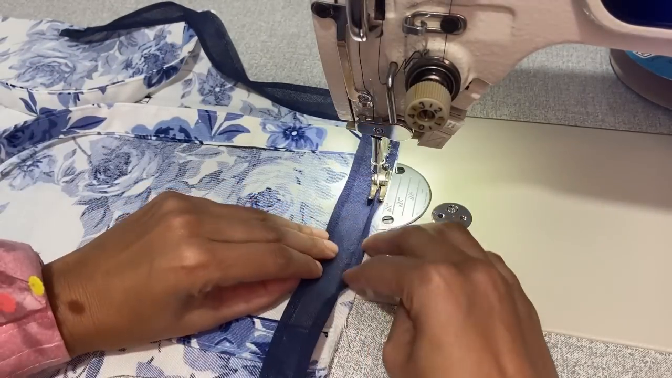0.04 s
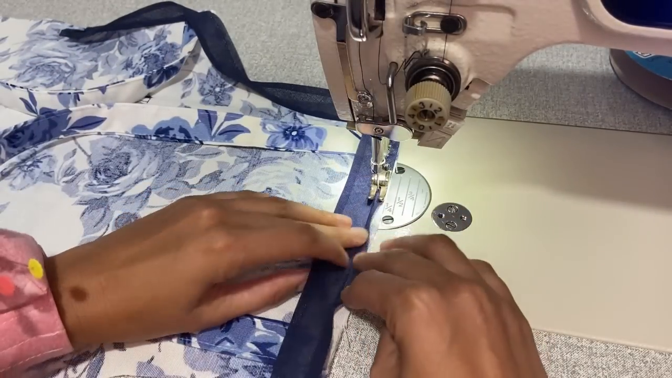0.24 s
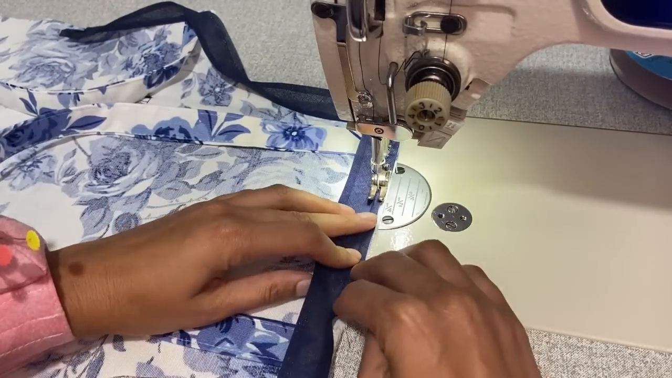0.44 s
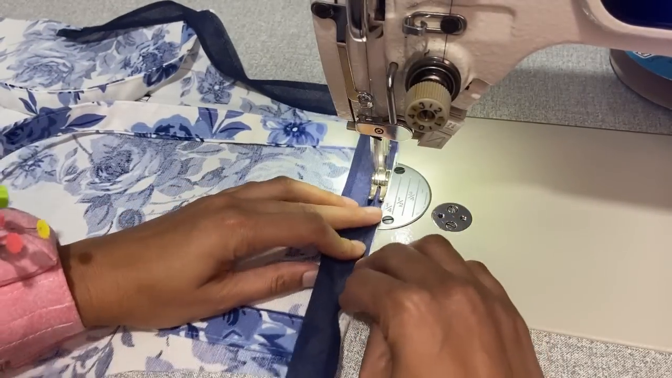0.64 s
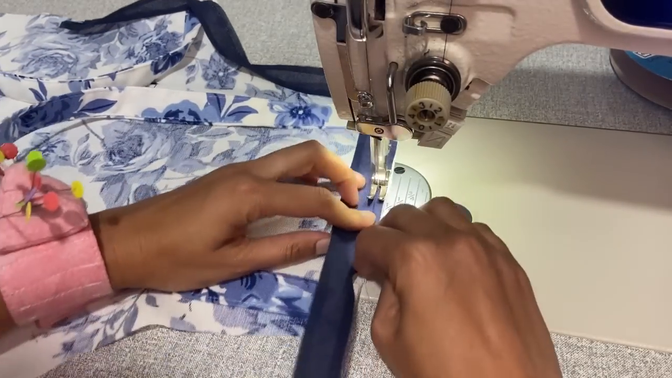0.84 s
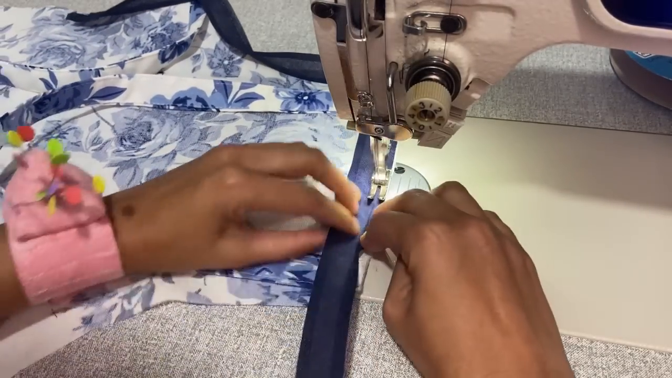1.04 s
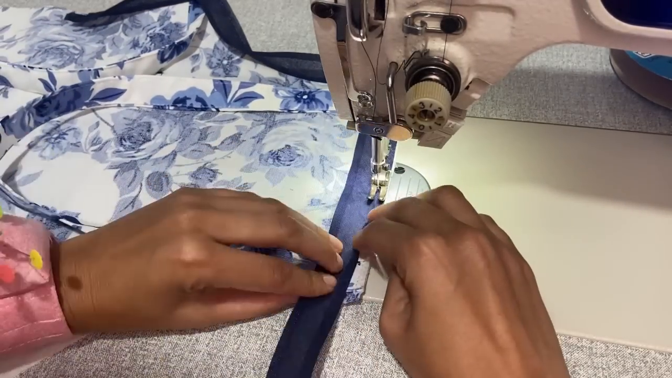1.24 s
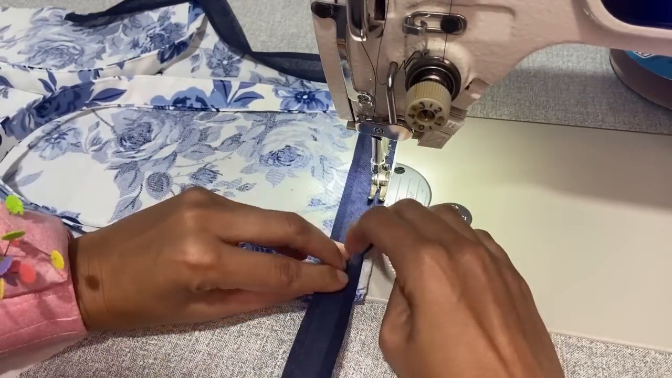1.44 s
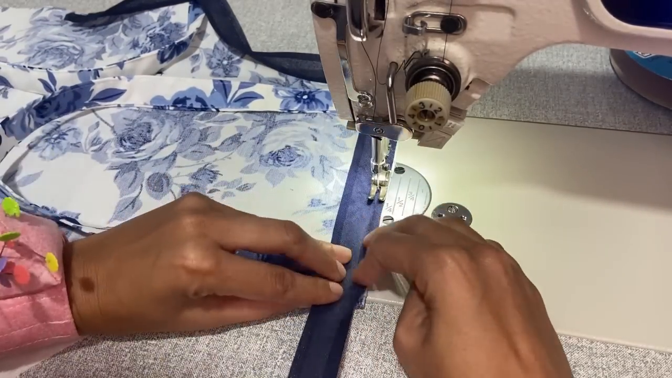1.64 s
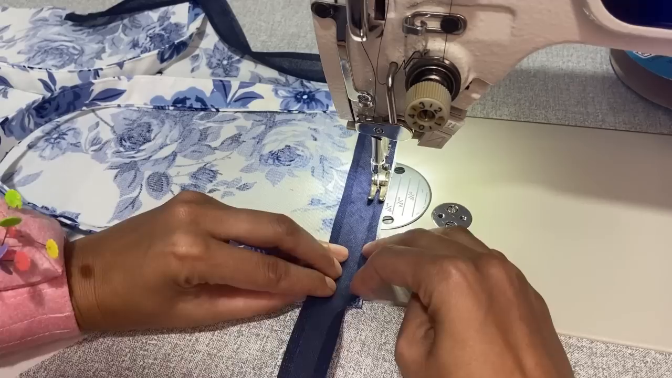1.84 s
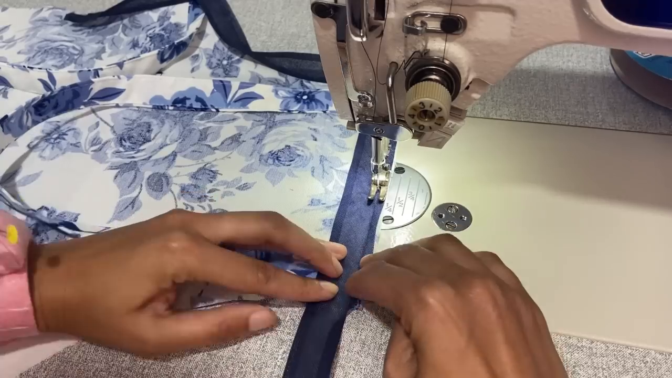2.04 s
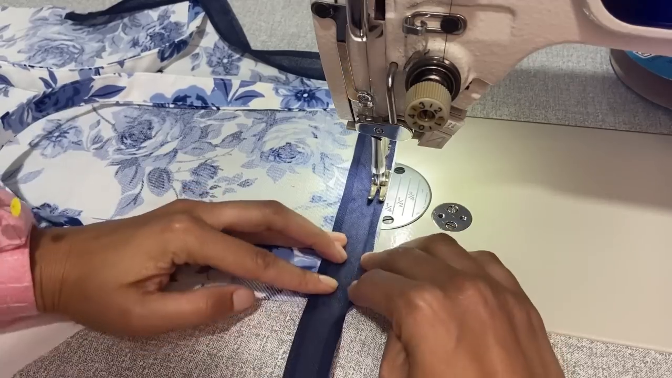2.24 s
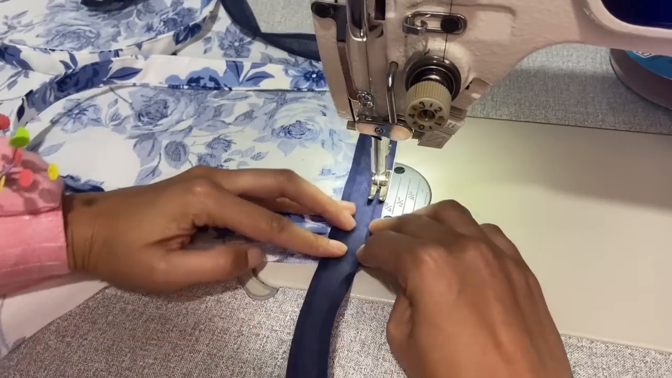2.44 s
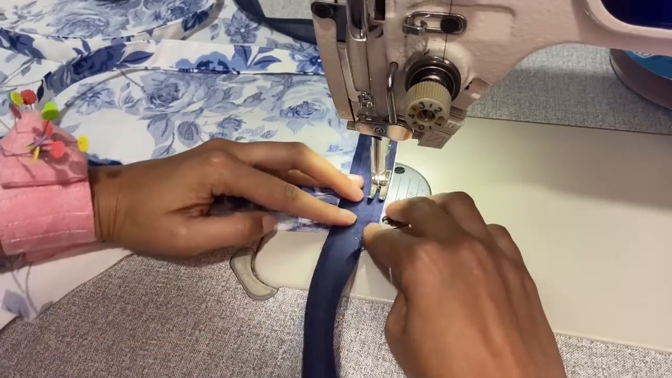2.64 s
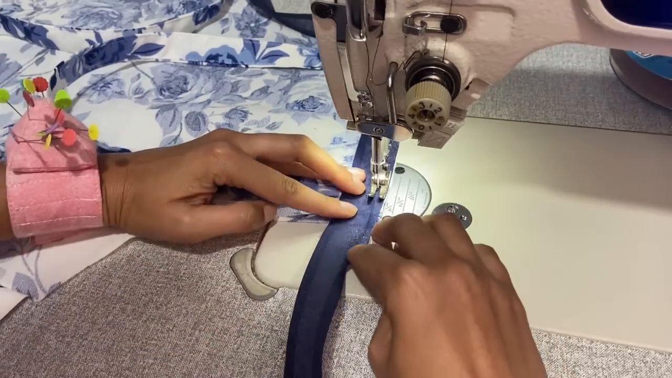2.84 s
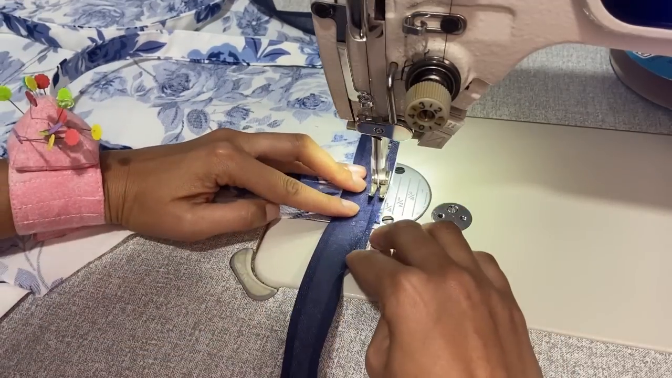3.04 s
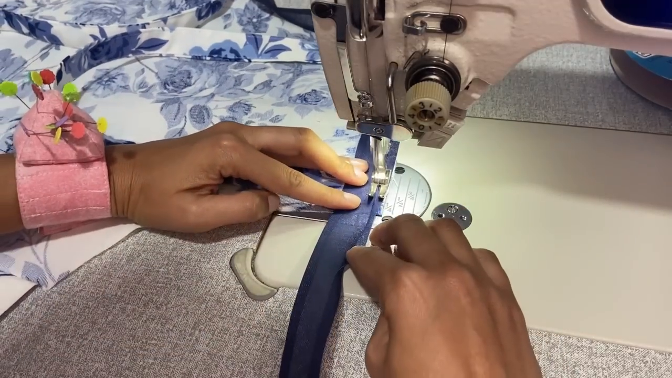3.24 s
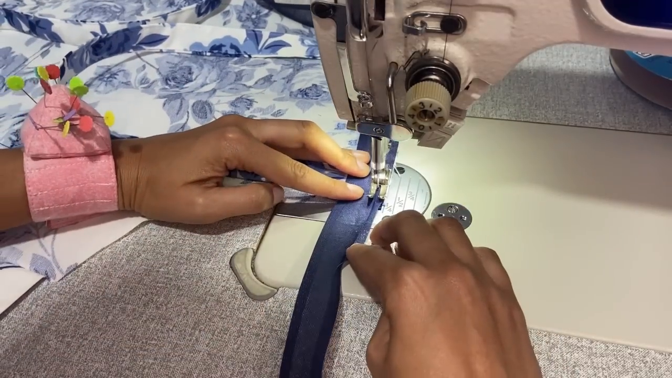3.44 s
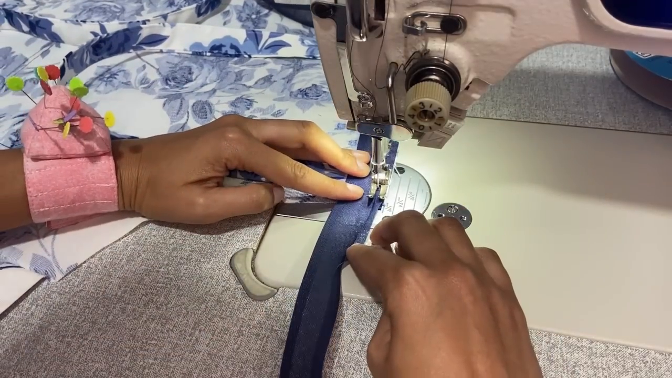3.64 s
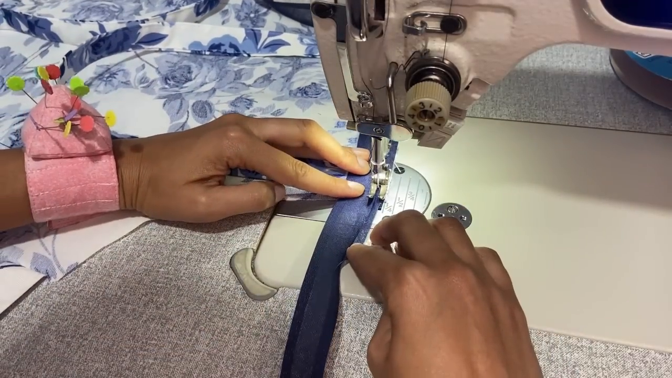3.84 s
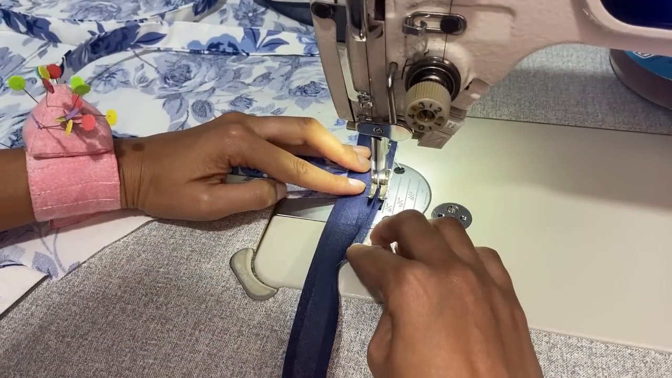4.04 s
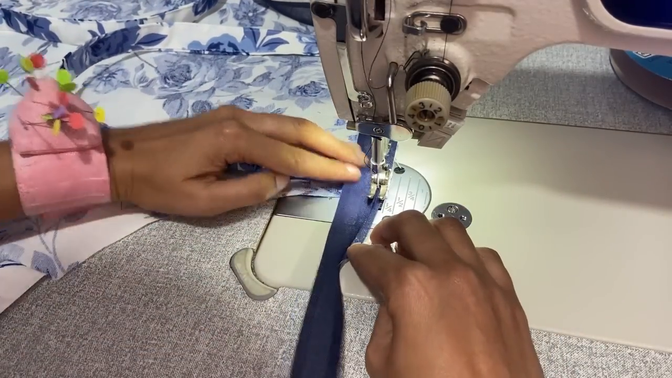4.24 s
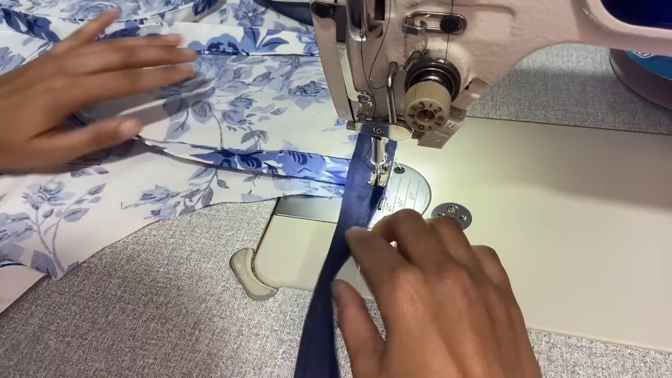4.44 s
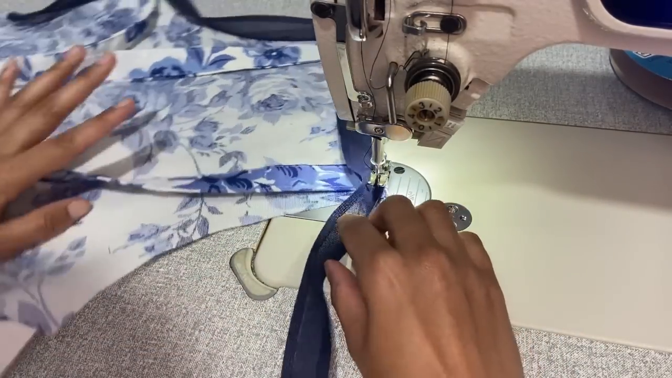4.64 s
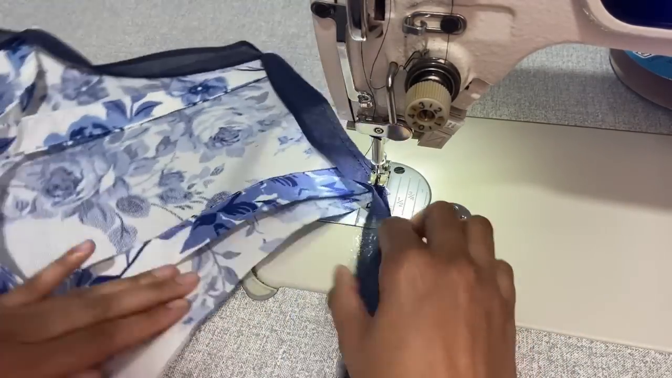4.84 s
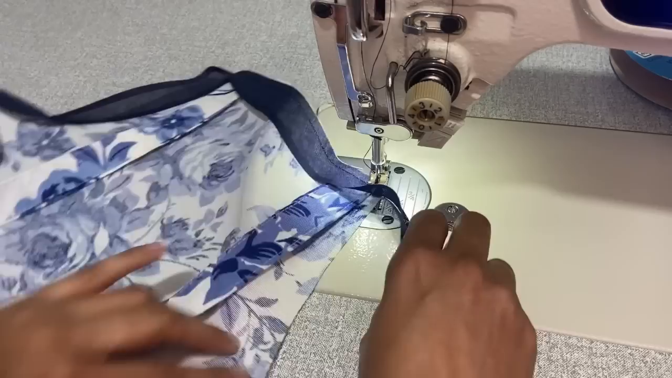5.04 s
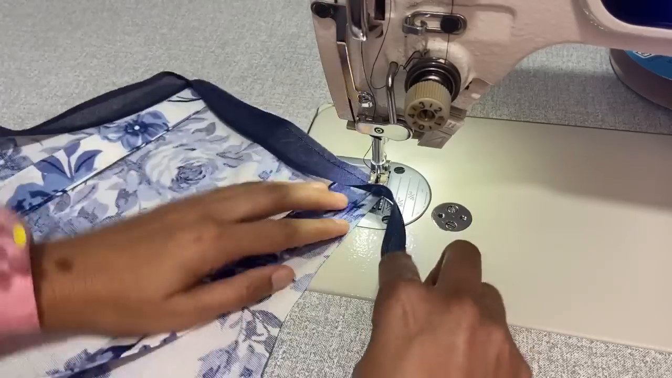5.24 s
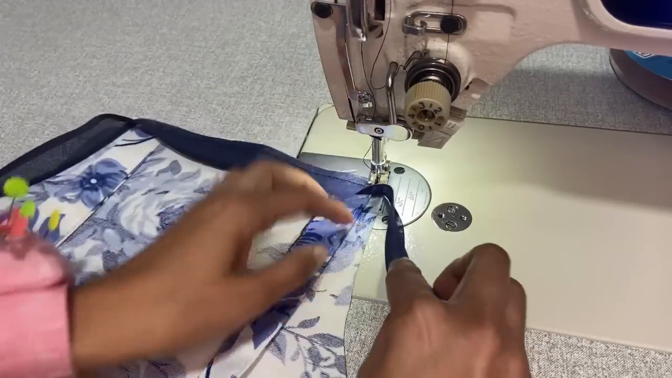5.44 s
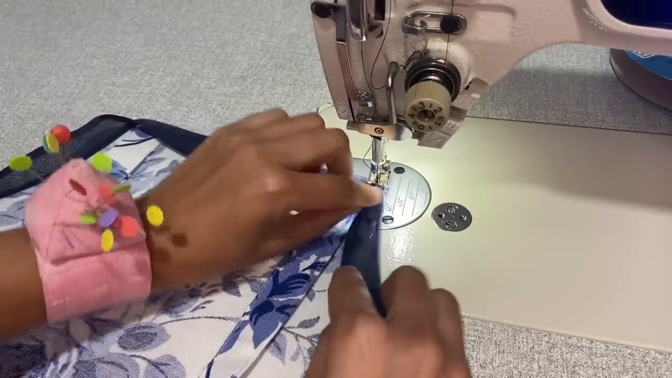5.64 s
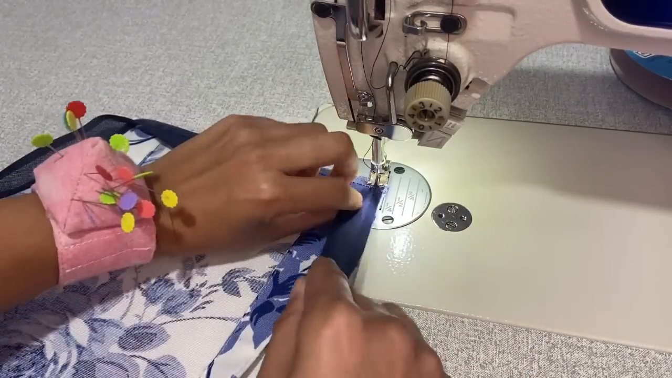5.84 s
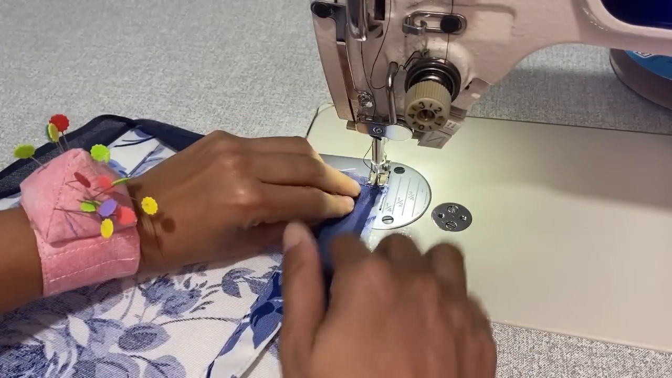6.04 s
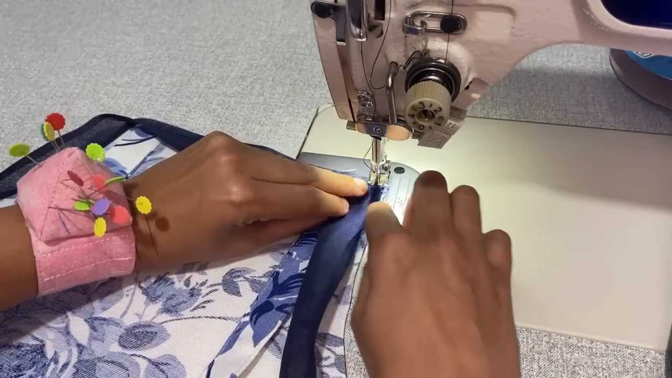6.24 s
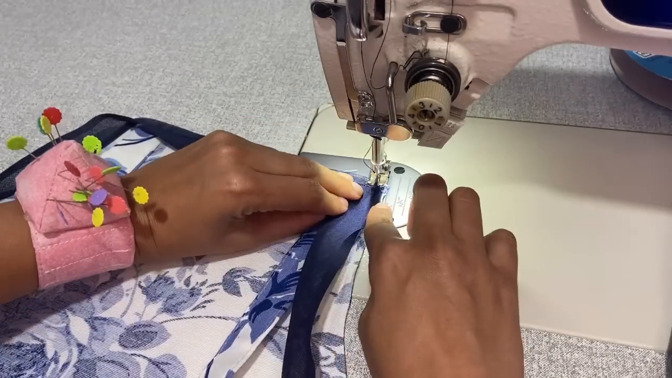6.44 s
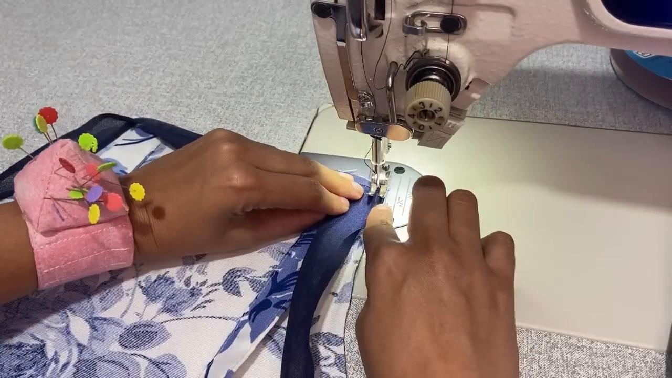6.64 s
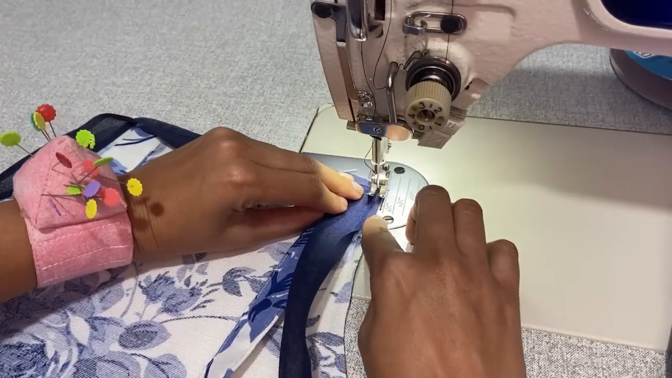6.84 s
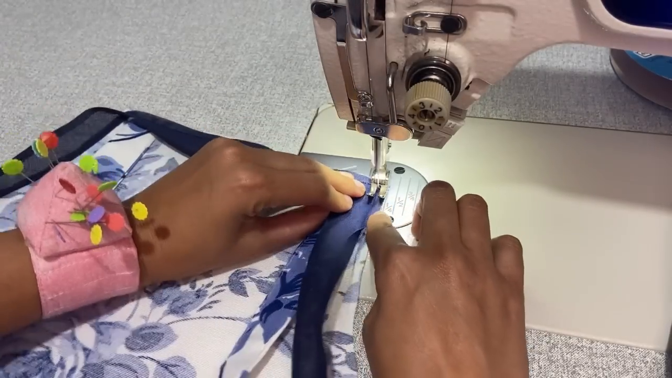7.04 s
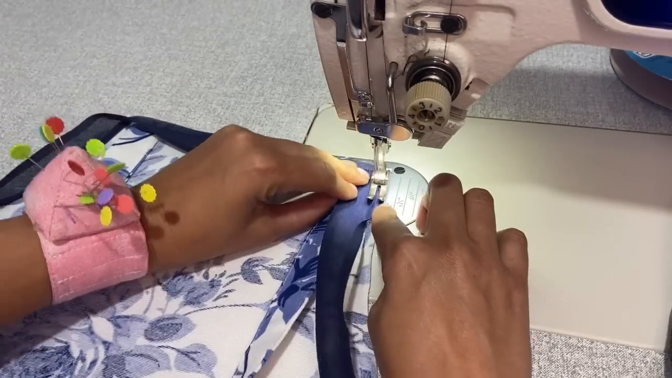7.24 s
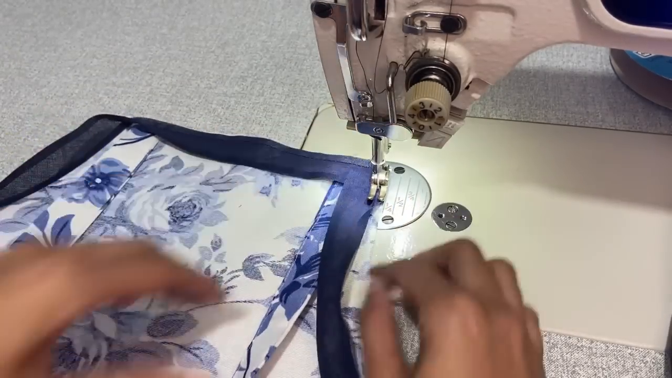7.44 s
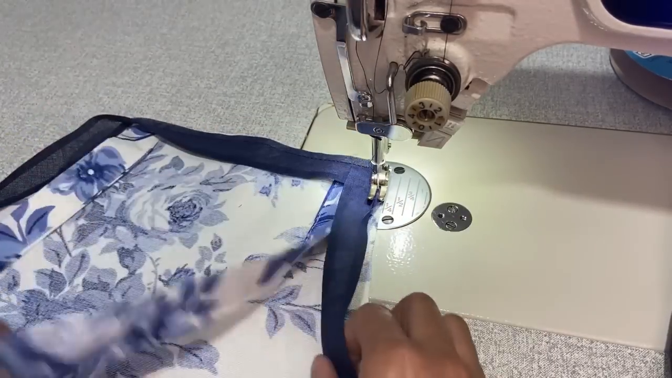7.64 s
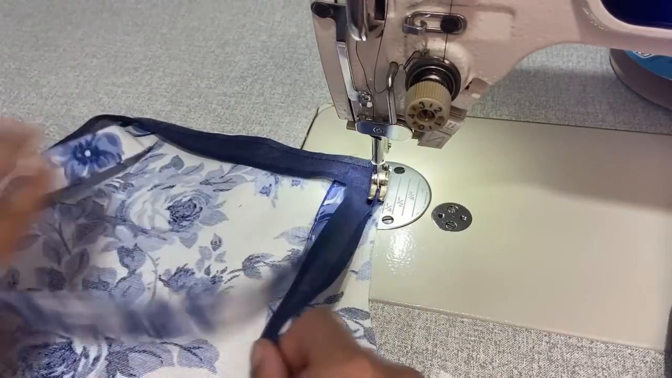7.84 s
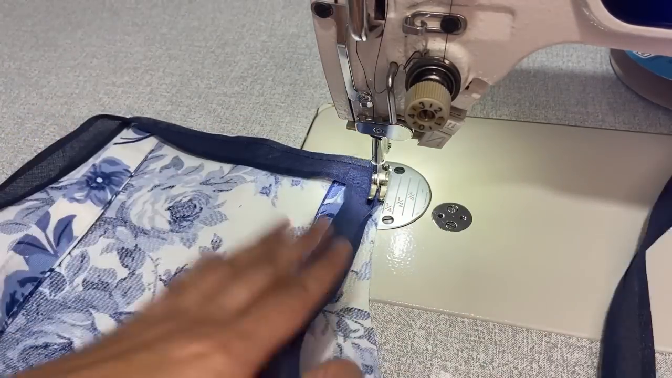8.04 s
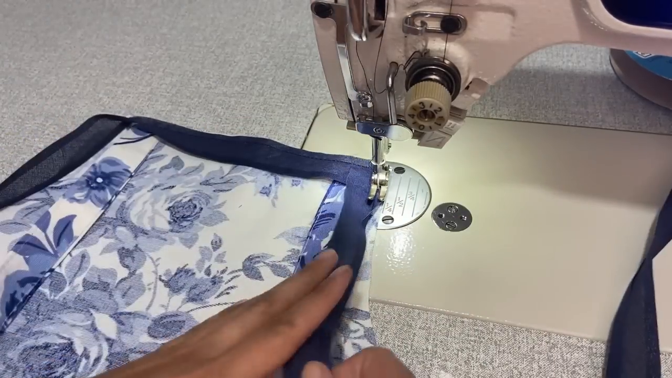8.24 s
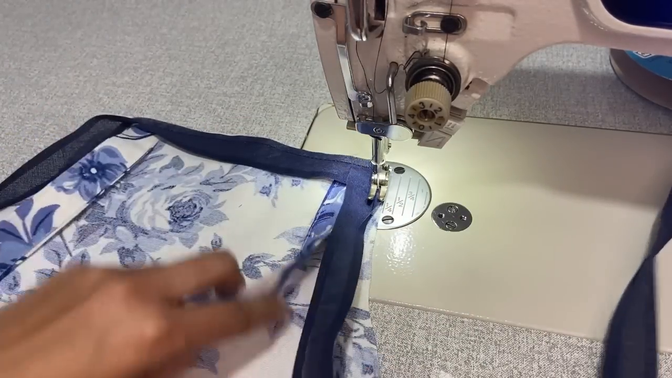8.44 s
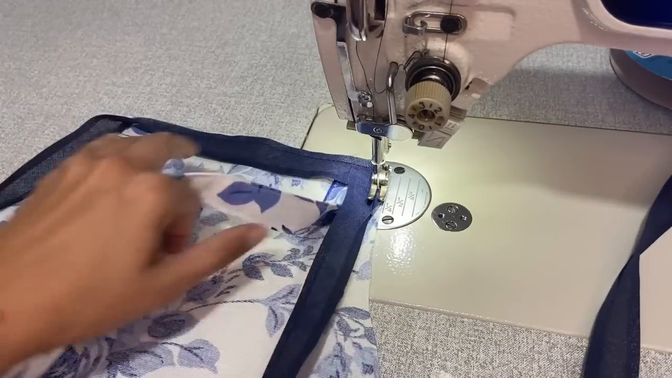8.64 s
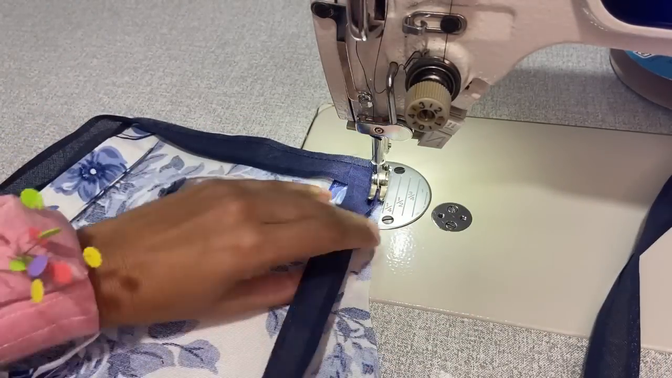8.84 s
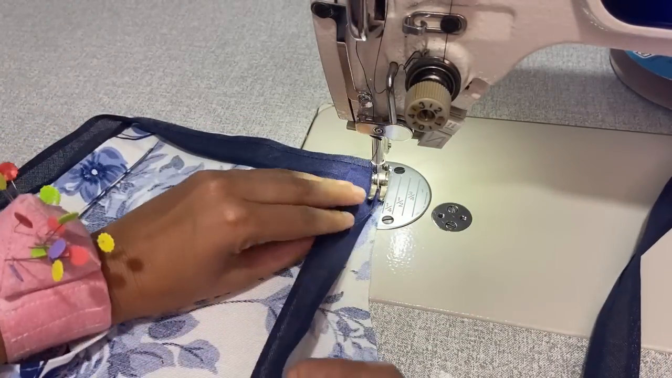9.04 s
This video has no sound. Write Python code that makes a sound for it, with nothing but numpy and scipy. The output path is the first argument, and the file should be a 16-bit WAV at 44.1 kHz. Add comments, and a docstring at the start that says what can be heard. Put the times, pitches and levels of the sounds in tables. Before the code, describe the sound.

A sewing machine stitches in brief bursts, each starting with a click, speeding into a thumping, droning rattle and braking to a latch. Pauses hold only quiet rumble and faint cloth. Midway the presser foot clacks up, fabric is shifted with rustles and dull thuds, the foot clacks down, one short run follows, then soft handling. Close microphone, small room, wide bright treble.

```python
"""An industrial sewing machine stitches in short runs, close to a two-port microphone.
Hook and needle bar clatter as bursts of resonant noise over the whirr of the drive; strokes thump the
ringing bed, table and head drone, cover plates ring on. Between runs the presser foot clacks up and down
as swelling noise bursts; soft thuds, knocks and low swells are short resonant noises, and hands shift
rustling cloth (filtered noise), in a small quiet room with a low rumble."""
import sys
import numpy as np
from scipy import signal
from scipy.fft import rfft, irfft, next_fast_len
from scipy.io import wavfile
from scipy.ndimage import uniform_filter1d

SR = 44100
rng = np.random.default_rng(int(sys.argv[2]) if len(sys.argv) > 2 else 0)


def int16_out(signal):
    """Quantize to a 16-bit WAV file."""
    q = np.round(np.clip(np.atleast_2d(signal).T, -1, 1) * 32767)
    wavfile.write(sys.argv[1], SR, q.astype(np.int16))


N = 401310
STEP = 64  # samples between the points of a slow control

# Runs of stitching; levels before the mix gains.
# Each row: start, brake, stop, full speed and slowing in seconds, then whirr, thump, table drone, head drone,
# brake jolt, click-in and latch in dB.
STITCH_RUNS = [(0.534, 1.103, 1.154, .62, 1.0, -39, -39, -43, -40, -50, -43.5, -42.5),
               (2.171, 2.767, 2.818, 2.33, 2.68, -38.5, -38, -35, -37, -47, -41.5, -43),
               (2.956, 3.417, 3.487, 3.23, 3.33, -42, -46, -50, -33, -50, -43, -41),
               (3.691, 3.805, 3.849, 3.70, 3.73, -52, -60, -66, -68, -44, -42.5, -43.5),
               (3.974, 4.07, 4.128, 3.985, 4.02, -54, -60, -66, -66, -40, -42, -43),
               (6.969, 7.313, 7.378, 7.11, 7.24, -39, -41, -46, -42, -40, -47, -44)]
# Strokes that stand out and replace an ordinary one; levels before the mix gains.
# Each row: time in seconds, level in dB, power share of needle bar against hook (0-1), thump in dB.
ACCENTED_STROKES = [(0.601, -39, 0.22, -44.5), (0.695, -32.5, 1, -46.5), (.823, -42, .6, -41),
                    (.869, -35.5, 1, -36.5), (0.898, -36.5, 1, -38.5), (0.944, -38.5, .4, -37),
                    (.993, -35, 0.2, -41), (1.062, -51, 0.6, -38.5), (2.257, -42, 0.09, -50),
                    (2.299, -38, 0.66, -41.5), (2.684, -36.5, 0, -41.5), (3.058, -42, 0.5, -55.5),
                    (3.082, -41.5, 0, -61), (3.178, -39.5, 0.1, -44), (3.234, -37, .64, -38),
                    (3.143, -46, 0.7, -53.5), (3.286, -34, 0.6, -62), (3.752, -48.5, 0.4, -56.5),
                    (2.358, -36, .8, -39.5), (3.357, -36, .16, -47.5), (4.013, -48, 0.2, -58.5),
                    (7.067, -43, .14, -52), (7.113, -36, .05, -43), (7.183, -37, 0.07, -43),
                    (7.235, -41.5, .05, -51)]
# drive speed in dB under full speed
ENGAGE_DB, CREEP_DB, DROP_DB, BRAKE_DB, STOP_DB = -18.5, -1.5, -11.5, -15.5, -23
FADE_IN_S, LEAD_S, DROP_S, FADE_OUT_S = .045, .0094, .042, .12  # drive catches LEAD_S before the click
CLICK_SHARE, BRAKE_SHARE, LATCH_SHARE, BRAKE_CLICK_DB = .19, .41, .08, -40  # shares of needle bar
STROKES_PER_S, STROKE_DB, STROKE_SPREAD_DB, THUMP_SPREAD_DB = 20, -1.5, 4, 4  # STROKE_DB re whirr
THUMP_STEEP, TABLE_STEEP, HEAD_STEEP = 1.62, 1.1, 1.43  # dB of level per dB of speed


def stitching():
    """Speed sets whirr, drones and ordinary strokes; clicks, jolts and accents have their own levels."""
    hook, bar, thump, jolt = np.zeros((4, N))
    t = np.arange(0, N, STEP) / SR
    whirr, table, head = np.zeros((3, len(t)))
    strokes = [row[:3] for row in ACCENTED_STROKES]
    accent_s = np.array(ACCENTED_STROKES)[:, 0]
    for s, _, _, thump_db in ACCENTED_STROKES:
        add_burst(thump, s, thump_db, 12, 20)
    for (start, brake, stop, full, slowing, whirr_db, thump_db, table_db, head_db,
         jolt_db, click_db, latch_db) in STITCH_RUNS:
        times = [start - FADE_IN_S, start - LEAD_S, full, slowing, slowing + DROP_S,
                 brake, stop, stop + FADE_OUT_S]
        speeds_db = [-45, ENGAGE_DB, CREEP_DB, 0, DROP_DB, BRAKE_DB, STOP_DB, -45]
        speed_db = np.interp(t, times, speeds_db, -200, -200)
        whirr += gain_of(whirr_db + speed_db) ** 2
        table += gain_of(table_db + TABLE_STEEP * speed_db) ** 2
        head += gain_of(head_db + HEAD_STEEP * speed_db) ** 2
        strokes += [(start, click_db, CLICK_SHARE), (brake, BRAKE_CLICK_DB, BRAKE_SHARE),
                    (stop, latch_db, LATCH_SHARE)]
        add_burst(jolt, brake, jolt_db, 14, 22)
        for k, (late, loud, hard, share) in enumerate(rng.standard_normal((16, 4))):
            s = start + (k + .1 * late) / STROKES_PER_S
            if s < brake - .03 and abs(s - accent_s).min() > .025:
                now_db = np.interp(s, t, speed_db)
                stroke_db = whirr_db + now_db + STROKE_DB + STROKE_SPREAD_DB * loud
                strokes.append((s, stroke_db, .6 + .16 * share))
                hit_db = thump_db + THUMP_STEEP * now_db + THUMP_SPREAD_DB * hard
                add_burst(thump, s, hit_db, 12, 20)
    for s, db, share in strokes:
        share = np.clip(share, .01, .99)
        add_burst(hook, s, db + 10 * np.log10(1 - share), 8, 10)
        add_burst(bar, s, db + 10 * np.log10(share), 10, 12)
    return hook, bar, thump, jolt, spread(whirr), spread(table), spread(head)


# Resonances of the hook. Each row: frequency in Hz, width in Hz, level in dB.
HOOK_MODES = [(860, 1900, -1), (2000, 310, 0.5), (3130, 320, -5.5), (4780, 860, -11), (7140, 380, 0),
              (8126, 980, 3), (12430, 700, -6.5), (12850, 800, -6.5), (13880, 430, -2),
              (15260, 1500, -12.5)]
# Resonances of the needle bar. Each row: frequency in Hz, width in Hz, level in dB.
NEEDLE_BAR_MODES = [(830, 1200, 1), (1950, 290, -20), (3100, 1400, 1), (5070, 1200, 2.5),
                    (7650, 410, -13.5), (8100, 600, -6.5), (9640, 3600, -3.5), (11800, 700, -1.5),
                    (12350, 500, -9.5), (13900, 600, -18.5), (15300, 1200, -6.5)]


def clatter_and_whirr(hook, bar, whirr):
    """Noise through the metal resonances; patches of colour stand for narrow modes of small parts."""
    whirr = whirr * flicker(5.4, 1.3) ** 2
    hook_ring, bar_ring = (
        mottle(noise(lambda hz: peaks(modes, hz)), frame=1024, bins=3, frames=6, depth_db=1.9)
        for modes in (HOOK_MODES, NEEDLE_BAR_MODES))
    sound = np.sqrt(hook + .78 * whirr) * hook_ring + np.sqrt(bar + .32 * whirr) * bar_ring
    return gain_of(-1.63) * sound * flicker(1.5, 1.5)  # fast random grain in the level


# Modes of bed and table, ringing freely. Each row: frequency in Hz, level in dB, t60 in seconds.
BED_MODES = [(96, 1, .3), (176, -4.5, 0.27), (217, -4, 0.38), (275.3, -7.5, 0.44), (325, -3, 0.097),
             (399.8, -9, 0.39), (520, -3, 0.04), (587.7, -4.5, 0.31), (620, -6.5, 0.14), (958, -8, .2),
             (1560, -6, 0.15), (1640, -9.5, 0.3), (1756, -11, 0.22)]


def bed_thumps(power):
    """Noise pushes excite the bed modes, here damped by cloth and foot."""
    push = np.sqrt(power) * noise(lambda hz: peaks([(402, 290, 0)], hz))
    return ring_on(push, [(hz, db, t60 / 2.43) for hz, db, t60 in BED_MODES])


def bed_blow(s, db, rise_ms, colour):
    """One blow sets the bed ringing freely; the colour of the blow weights the modes."""
    near = slice(round((s - .03) * SR), round((s + .6) * SR))
    out = np.zeros((2, N))
    t = (np.arange(N) / SR - s)[near]
    swell = np.exp(-(np.minimum(t, 0) * 1000 / rise_ms) ** 2)
    for hz, mode_db, t60 in BED_MODES:
        turn = 2 * np.pi * (hz * t + rng.random() + np.array([[0], [.25]]))  # quarter turn between channels
        decay = gain_of(db + mode_db - 60 * np.maximum(t, 0) / t60)
        out[:, near] += peaks(colour, hz) * decay * swell * np.sin(turn)
    return out


TABLE_LAG_S, HEAD_LAG_S = .05, .035  # the drones build up and ring on
TABLE_JOLT_DB, HEAD_JOLT_DB = -8.5, -2  # share of the brake jolt in each drone


def drones(table, head, jolt):
    """Table and head resonate as narrow low noise, lagging behind the drive and the brake jolt."""
    table = linger(table + gain_of(TABLE_JOLT_DB) ** 2 * jolt, TABLE_LAG_S)
    head = linger(head + gain_of(HEAD_JOLT_DB) ** 2 * jolt, HEAD_LAG_S)
    table_modes = [(84.5, 12, 19.5), (98.0, 48, 6.0), (113.8, 21, -4.0)]
    table = table * steady(noise(lambda hz: peaks(table_modes, hz)))
    head = head * steady(noise(lambda hz: peaks([(168.0, 81, 0)], hz)))
    return table + head


# Thin cover plates. Each row: frequency in Hz, level in dB.
PLATE_MODES = [(545, 7), (1820, 0), (1945, -1), (2010, -4.5), (2450, 2), (4910, -4.5)]
PLATES_DB, PLATES_T60_S = -14.5, .16


def cover_plates(clatter):
    """The clatter excites thin plates, which ring on briefly."""
    return gain_of(PLATES_DB) * ring_on(clatter, [(hz, db, PLATES_T60_S) for hz, db in PLATE_MODES])


def machine():
    """Direct clatter, and the rumble of the structure it shakes."""
    hook, bar, thump, jolt, whirr, table, head = stitching()
    clatter = clatter_and_whirr(hook, bar, whirr)
    thumps = gain_of(-7.5) * bed_thumps(thump + jolt)
    return clatter, thumps + drones(table, head, jolt) + cover_plates(clatter)


# Resonances of the foot going up. Each row: frequency in Hz, width in Hz, level in dB.
FOOT_UP_MODES = [(199, 82, 0), (615, 130, -3), (1000, 900, -8), (1800, 290, 1), (2520, 550, -12),
                 (4830, 820, -13.5), (5700, 190, -13.5), (7160, 1800, -16.5), (8400, 500, -29),
                 (9100, 1200, -8), (13700, 700, -10), (15500, 950, -15)]
# Resonances of the foot going down. Each row: frequency in Hz, width in Hz, level in dB.
FOOT_DOWN_MODES = [(120, 210, 2), (577, 130, 1.5), (1170, 270, -4), (1790, 260, -5.5), (2280, 750, -5.5),
                   (4230, 810, -10.5), (5700, 700, -11), (7300, 1000, -5.5), (8800, 600, -18.5),
                   (8830, 1100, -2.5), (11540, 340, -10), (13400, 750, -2.5), (14200, 600, -18.5),
                   (15600, 790, -12)]
# Foot clacks, up then down. Each row: peak time in seconds, level in dB, rise in ms, fall in ms,
# bed ring in dB before mode weighting.
FOOT_CLACKS = [(4.417, -19, 11.1, 8, -19.5), (6.647, -16.5, 11.7, 6.6, -22.5)]


def presser_foot():
    """A faint, wider swell of noise leads into each clack of resonant noise; the clack sets the bed ringing."""
    clack, ring = np.zeros((2, 2, N))
    for (s, db, rise_ms, fall_ms, ring_db), modes in zip(FOOT_CLACKS, [FOOT_UP_MODES, FOOT_DOWN_MODES]):
        power = np.zeros(N)
        near = slice(round(s * SR) - SR // 4, round(s * SR) + SR // 4)
        add_burst(power, s, db, rise_ms, fall_ms)
        add_burst(power, s, db - 26, 28, 45)  # faint wide swell
        add_burst(power, s + .016, db - 37, 30, 85)  # loose parts rattle on
        clack[:, near] += np.sqrt(power[near]) * noise(lambda hz: peaks(modes, hz), size=SR // 2)
        ring += bed_blow(s + .01, ring_db, 1.3 * rise_ms, modes)
    return clack, ring


# Soft thuds, knocks and low swells. Each row: time in seconds, level in dB before a 5 dB cut, thud in Hz,
# power decay constant in ms, tap in Hz, tap over thud in dB.
THUDS_AND_TAPS = [(1.236, -46, 90, 25, 293, -9), (1.311, -48, 85, 49, 286, -14.5),
                  (2.043, -49, 85, 40, 300, -76), (1.416, -46, 520, 7.5, 293, 7),
                  (4.797, -40.5, 224, 15, 390, -10), (5.23, -46, 216, 9.9, 620, -18),
                  (5.381, -53.5, 302, 31, 570, 2), (5.816, -56.5, 196, 16, 1130, -1),
                  (5.93, -50, 220, 30, 573, -13), (6.063, -46, 290, 9, 1780, -29),
                  (6.326, -50.5, 150, 11.5, 736, -7), (6.516, -39.5, 259, 37, 855, -22.5),
                  (7.547, -47.5, 292, 22, 625, -35.5), (7.979, -45, 155, 17, 617, -34),
                  (8.043, -41.5, 331, 8.7, 1180, -7.5), (8.129, -46, 86, 5.9, 300, -35),
                  (8.421, -39.5, 280, 14, 985, 0.5), (8.607, -42, 264, 23, 690, -4.5),
                  (8.768, -52.5, 150.3, 20, 447, -7.5)]


def knocks():
    """Soft short thuds and low swells, some with a brighter tap: decaying resonant noise."""
    out = np.zeros((2, N + 4000))
    ms = np.arange(4000) / SR * 1000
    for s, db, thud_hz, length_ms, tap_hz, tap_db in THUDS_AND_TAPS:
        modes = [(thud_hz, .5 * thud_hz, 0), (tap_hz, .35 * tap_hz, tap_db),
                 (2 * tap_hz, .4 * tap_hz, tap_db - 8)]
        # soft, little treble
        body = noise(lambda hz: peaks(modes, hz) / (1 + (hz / (3.5 * tap_hz)) ** 4), size=4000)
        shape = (1 - np.exp(-(ms / 4.5) ** 2)) * np.exp(-ms / length_ms / 2)
        out[:, round((s - .004) * SR):][:, :4000] += gain_of(db - 5) * body * shape
    return out[:, :N]


# Colour of cloth friction. Each row: frequency in Hz, level in dB.
CLOTH_COLOUR = [(250, 9), (600, 2), (1200, 1), (2500, 0), (4500, -2.5), (6500, -5), (9000, -4.5),
                (12000, -6.5), (15500, -6)]
# Cloth slides under the hands. Each row: start in seconds, end in seconds, level in dB.
CLOTH_SLIDES = [(0, 0.042, -75), (.225, 0.28, -71.5), (1.282, 1.413, -75), (1.59, 1.72, -77.5),
                (2.014, 2.073, -72.5), (4.166, 4.253, -72), (4.594, 4.734, -64.5), (4.745, 4.859, -57.5),
                (4.93, 5.105, -65.5), (5.237, 5.3, -67.5), (5.325, 5.351, -58.5), (5.559, 5.72, -72.5),
                (5.812, 5.887, -74), (5.99, 6.13, -68.5), (7.555, 7.75, -70), (7.791, 7.954, -63),
                (8.0, 8.128, -66), (8.299, 8.343, -65.5), (8.353, 8.55, -65), (8.63, 8.673, -74.5),
                (8.733, 8.912, -68.5), (8.996, 9.05, -68.5)]
# Short flicks of cloth. Each row: time in seconds, level in dB.
CLOTH_FLICKS = [(.425, -75), (1.54, -73), (1.925, -66.5), (5.657, -68.5), (6.066, -63), (6.245, -71.5),
                (6.331, -62), (8.43, -60), (8.625, -63.5)]
SLIDE_RISE_DB_PER_S, SLIDE_FALL_DB_PER_S = 326.5, 169
FLICK_RISE_MS, FLICK_FALL_MS = 10.2, 18.3
REST_DB = -86.5  # the cloth never lies quite still


def cloth():
    """Fine friction hiss whose colour drifts as different folds rub."""
    t = np.arange(0, N, STEP) / SR
    power = np.full(len(t), gain_of(REST_DB) ** 2)
    for start, end, db in CLOTH_SLIDES:
        before_db = SLIDE_RISE_DB_PER_S * np.maximum(start - t, 0)
        after_db = SLIDE_FALL_DB_PER_S * np.maximum(t - end, 0)
        power += gain_of(db - (before_db + after_db)) ** 2
    power = spread(power) * flicker(30, 1.6) ** 2
    for s, db in CLOTH_FLICKS:
        add_burst(power, s, db, FLICK_RISE_MS, FLICK_FALL_MS)
    hiss = noise(lambda hz: gain_of(read(CLOTH_COLOUR, hz)) * (hz > 150))
    return np.sqrt(power) * flicker(5.5, 1.0) * mottle(hiss, frame=610, bins=10, frames=9, depth_db=2.5)


# Reverberation. Each row: frequency in Hz, t60 in seconds.
ROOM_T60 = [(150, 0.9), (600, 0.44), (2000, 0.36), (5000, 0.22), (9000, 0.056), (15000, 0.069)]


def room(x):
    """Diffuse reflections: the power of each band lingers and dies at its own speed, in random phases."""
    hz, t, z = signal.stft(x, SR, nperseg=512)
    power = abs(uniform_filter1d((abs(z) ** 2).mean(0), size=2, axis=0))
    keep = gain_of(-2 * 60 * t[1] / read(ROOM_T60, hz))  # share of power left one frame later
    tail = np.array([signal.lfilter([0, 1 - k], [1, -k], row) for k, row in zip(keep, power)])
    a, b = rng.standard_normal((2,) + z.shape)
    return signal.istft(np.sqrt(tail) * (a + 1j * b), SR, nperseg=512)[1][:, :N]


# Colour of the room tone. Each row: frequency in Hz, relative level in dB.
ROOM_TONE_COLOUR = [(12, -40.5), (20, -15.5), (63, 9.5), (186, -14.5), (216, -11.5), (398, -22.5),
                    (439, -18.5), (734, -33), (1110, -39.5), (1290, -42), (3360, -52.5), (7000, -46),
                    (9100, -64.5), (15400, -120)]
ROOM_TONE_DB = -59


def room_tone():
    """Low wavering rumble with a faint hiss: coloured noise."""
    tone = noise(lambda hz: gain_of(read(ROOM_TONE_COLOUR, hz)))
    return gain_of(ROOM_TONE_DB) * flicker(60, .82) * tone


def gain_of(db):
    """Decibels to amplitude."""
    return 10 ** (np.asarray(db) / 20)


def read(points, hz):
    """A spectrum table on a log-frequency axis."""
    f, value = np.transpose(points)
    return np.interp(np.log(hz + 1), np.log(f + 1), value)


def peaks(modes, hz):
    """Amplitude response of resonances whose powers add; small parts radiate no deep bass."""
    power = sum(gain_of(db) ** 2 / (1 + (2 * (hz - f) / width) ** 2) ** 1.39 for f, width, db in modes)
    return hz ** 2 / (hz ** 2 + 70 ** 2) * np.sqrt(power)


def noise(response, size=N):
    """Two unrelated noises of joint rms 1 with the given amplitude response."""
    size_fft = next_fast_len(size)
    hz = np.fft.rfftfreq(size_fft, 1 / SR)
    grid = hz[::1 + size // 30000]  # a coarse grid is enough for the response
    white = rfft(rng.standard_normal((2, size_fft)))
    x = irfft(white * np.interp(hz, grid, response(grid)), size_fft)[:, :size]
    return x / np.sqrt(np.mean(x ** 2))


def flicker(ms, depth_db):
    """Random gain that wanders at the given time scale."""
    width = max(int(ms * SR / 1000), 2)
    x = uniform_filter1d(uniform_filter1d(rng.standard_normal(N), width), width)
    return gain_of(depth_db * x / x.std())


def add_burst(power, s, db, rise_ms, fall_ms):
    """Adds one swelling and dying Gaussian burst to a power envelope."""
    n = np.arange(-4000, 9000) + round(s * SR)
    ms = (n / SR - s) * 1000
    shape = np.exp(-(ms / np.where(ms < 0, rise_ms, fall_ms)) ** 2)
    power[np.clip(n, 0, N - 1)] += gain_of(db) ** 2 * shape


def ring_on(x, modes):
    """Excites decaying modes (Hz, dB, t60 s) with x; the impulse response has unit energy."""
    t = np.arange(SR // 4) / SR
    ring = sum(gain_of(db - 60 * t / t60) * np.sin(2 * np.pi * hz * t) for hz, db, t60 in modes)
    return signal.oaconvolve(x, ring[None] / np.linalg.norm(ring), axes=1)[:, :N]


def steady(x):
    """Evens out most of the slow wavering of a narrow noise."""
    return x / (uniform_filter1d(x ** 2, 1300) + .05) ** .35


def mottle(x, frame, bins, frames, depth_db):
    """Random patches over time and frequency lift or sink the colour of a sound."""
    hz, t, z = signal.stft(x, SR, nperseg=frame)
    patches = uniform_filter1d(uniform_filter1d(rng.standard_normal(z.shape[1:]), bins, 0), frames, 1)
    return signal.istft(z * gain_of(depth_db * patches / patches.std()), SR, nperseg=frame)[1][:, :N]


def linger(power, lag_s):
    """Amplitude of a resonance that follows its drive power late and rings on."""
    keep = np.exp(-1 / (max(lag_s, .001) * SR))
    return np.sqrt(signal.lfilter([1 - keep], [1, -keep], power + 1e-18))


def spread(power):
    """Spreads a coarse control over every sample."""
    return np.interp(np.arange(N), np.arange(len(power)) * STEP, power)


def scene():
    """Two unrelated renderings of the sound field, mixed into left and right by record()."""
    clatter, rumble = machine()
    clack, ring = presser_foot()
    near = clatter + clack + knocks()
    return near + gain_of(-5) * room(near) + rumble + ring + cloth() + room_tone()


# Likeness of left and right below TREBLE_HZ. Each row: frequency in Hz, left-right likeness (0-1).
STEREO_LIKENESS = [(60, 0.96), (200, 0.96), (500, 0.64), (900, 0.2), (1800, 0.3), (3000, .65), (4500, 0.69),
                   (5900, 0.45), (6300, 0.59), (6600, 1)]
# Balance below TREBLE_HZ. Each row: frequency in Hz, left over right in dB.
STEREO_BALANCE = [(100, -0.5), (400, 2), (700, 0.5), (1300, 0), (2400, 3.5), (4400, 2), (6000, 5.5),
                  (6500, 1)]
# above TREBLE_HZ the left-right phase turns with frequency, in flat steps: a hollow, wide treble
TREBLE_HZ, HZ_PER_TURN, FLAT_RAD, EDGE_HZ = 6850, 4320, .25, 15820


def record(dry):
    """Left and right share part of the field; the treble is hollow and wide, and ends at EDGE_HZ."""
    size = next_fast_len(N)
    hz = np.fft.rfftfreq(size, 1 / SR)
    left, other = rfft(dry, size)
    turn = 2 * np.pi * np.maximum(hz - TREBLE_HZ, 0) / HZ_PER_TURN
    off = turn - np.pi * np.round(turn / np.pi)  # distance to the nearest half turn
    beyond_flat = np.sign(off) * np.maximum(abs(off) - FLAT_RAD, 0)
    phase = turn - off + beyond_flat * np.pi / (np.pi - 2 * FLAT_RAD)
    low_same = np.clip(read(STEREO_LIKENESS, hz), 0, 1)
    high_same = 1 - np.clip(.38 * np.sin(phase) ** 2, 0, 1)
    same = np.where(hz < TREBLE_HZ, low_same, high_same)
    right = (same * left + np.sqrt(1 - same ** 2) * other) * np.exp(1j * phase)
    tilt = gain_of(read(STEREO_BALANCE, hz) * (hz < TREBLE_HZ) / 2)
    pair = irfft(np.array([left * tilt, right / tilt]), size)[:, :N]
    low_pass = signal.firwin(511, EDGE_HZ, window=("kaiser", 9), fs=SR)
    return signal.oaconvolve(pair, low_pass[None], "same")


dry = scene()
out = record(dry)
int16_out(out)
```